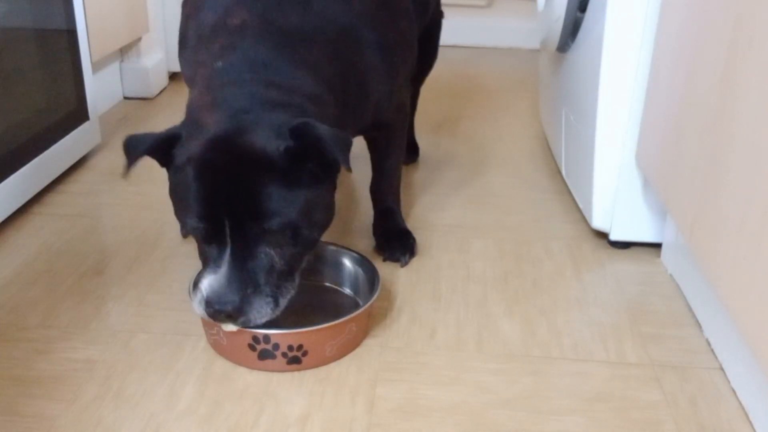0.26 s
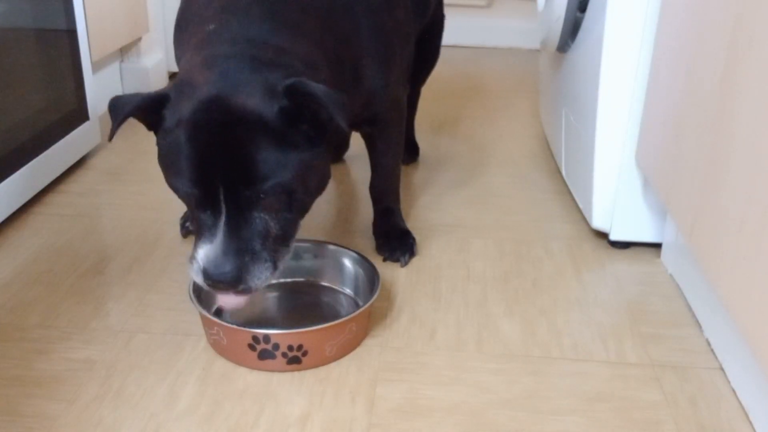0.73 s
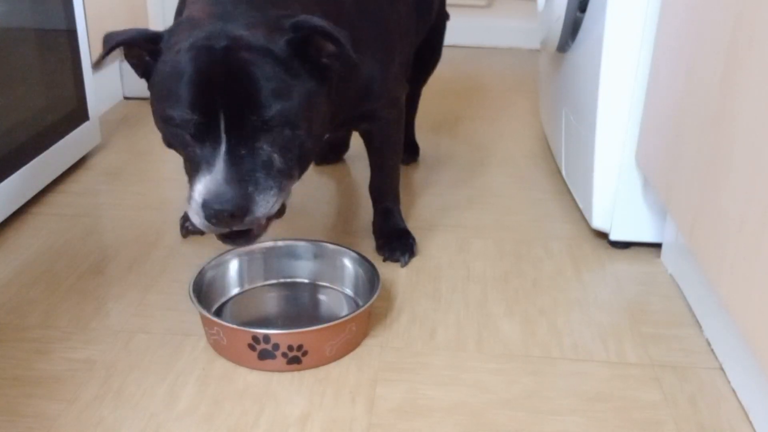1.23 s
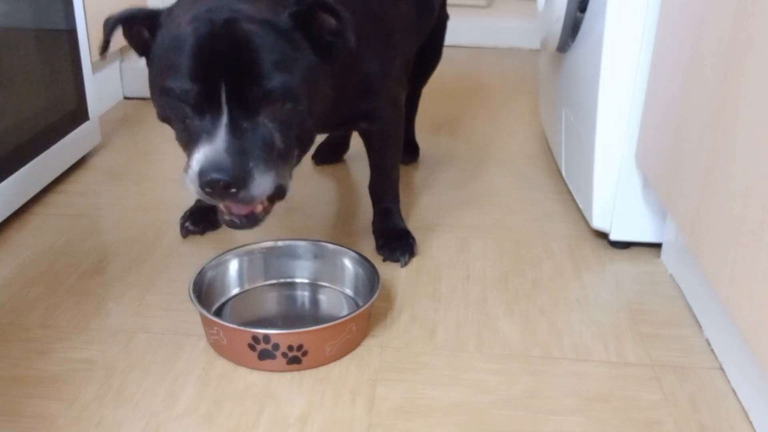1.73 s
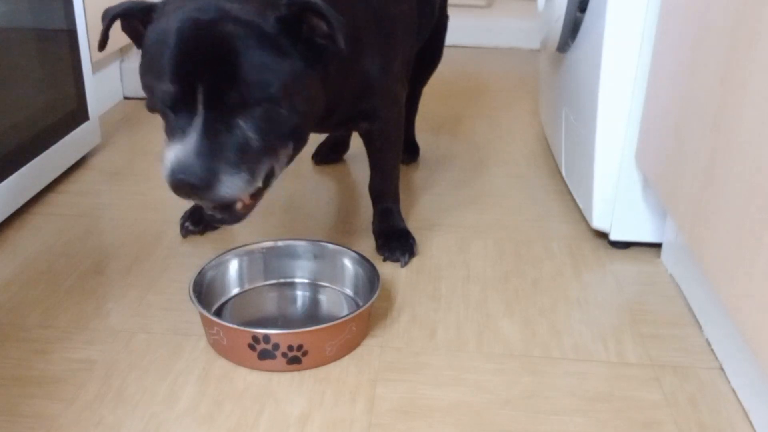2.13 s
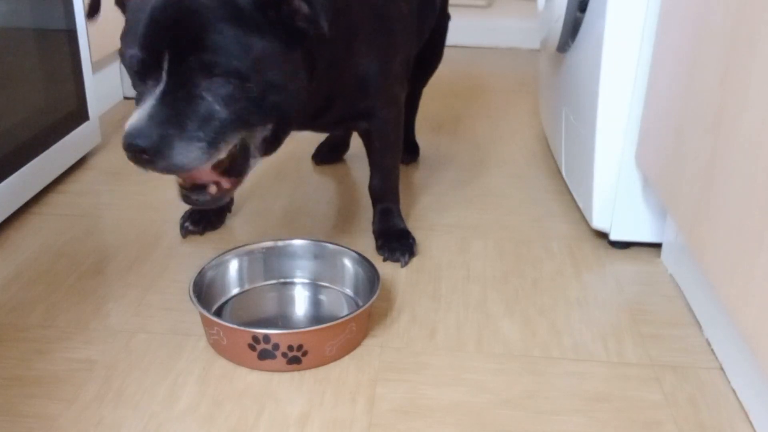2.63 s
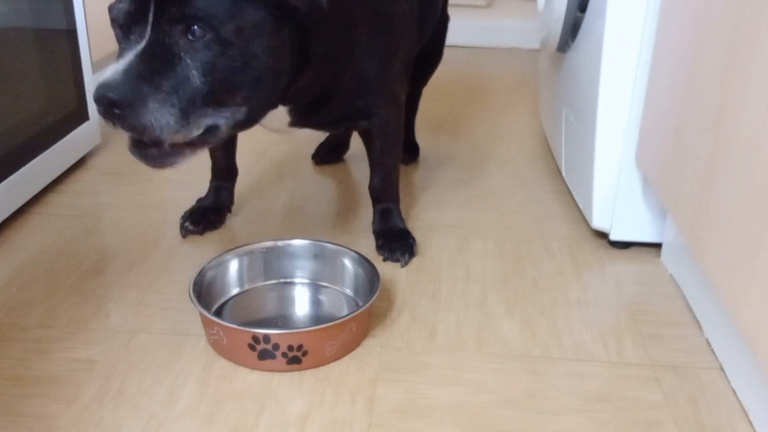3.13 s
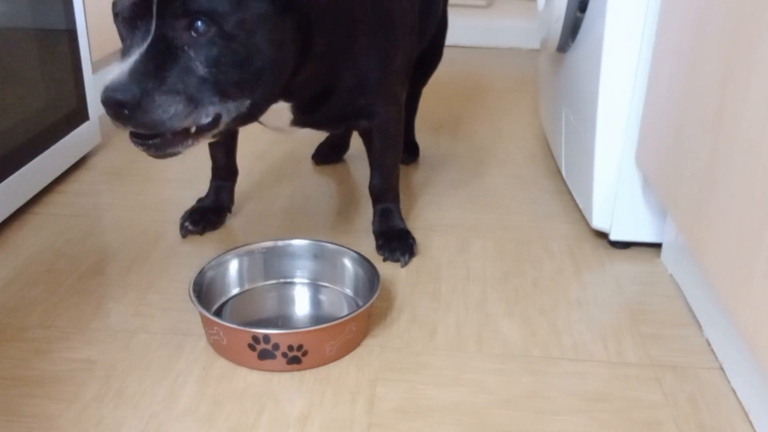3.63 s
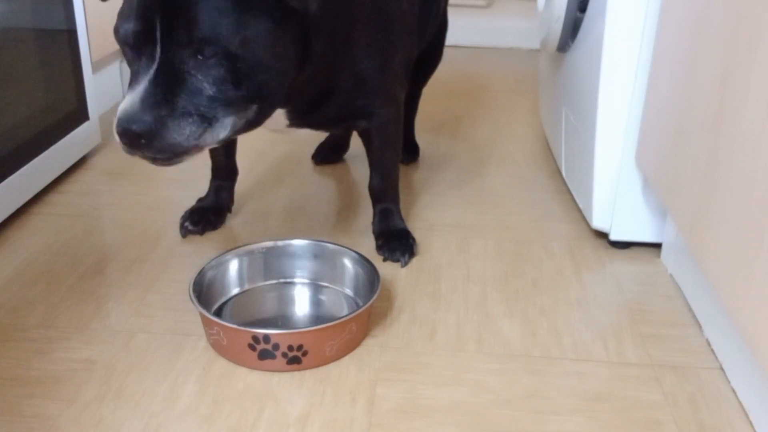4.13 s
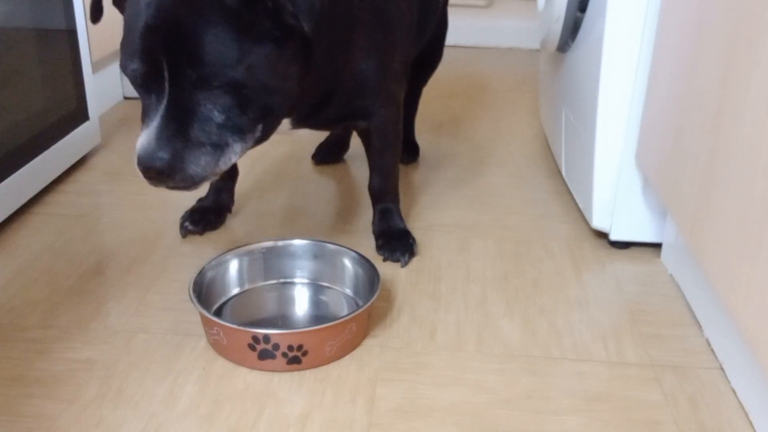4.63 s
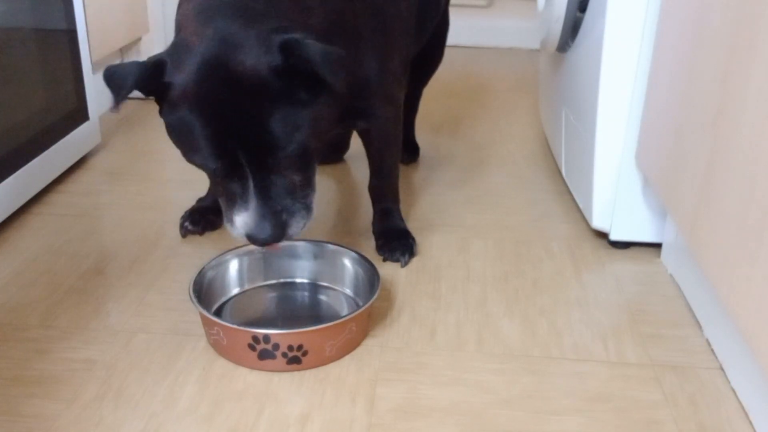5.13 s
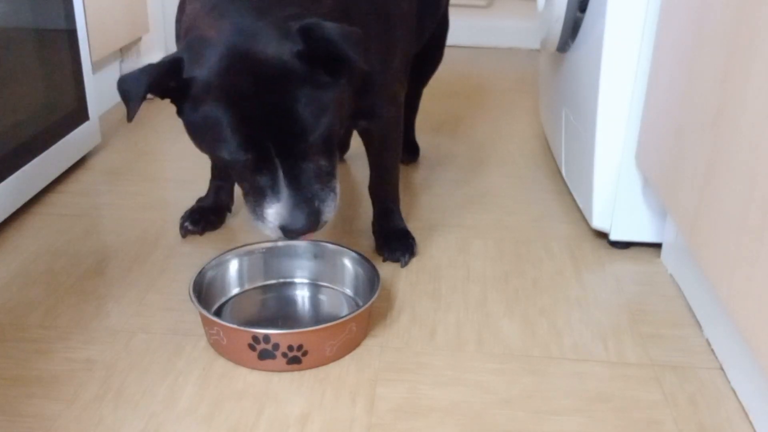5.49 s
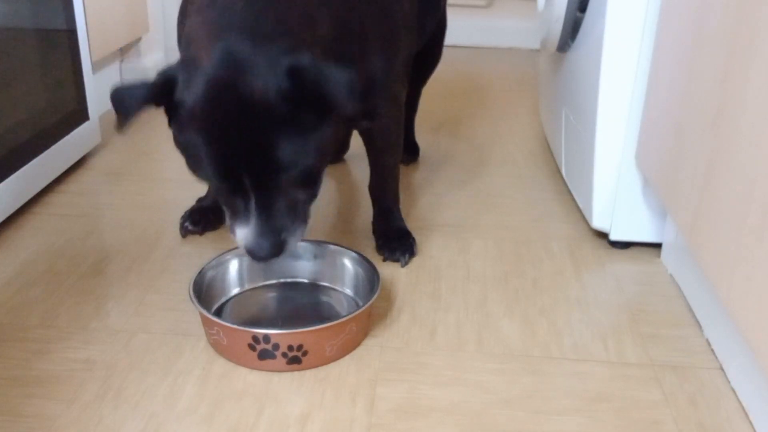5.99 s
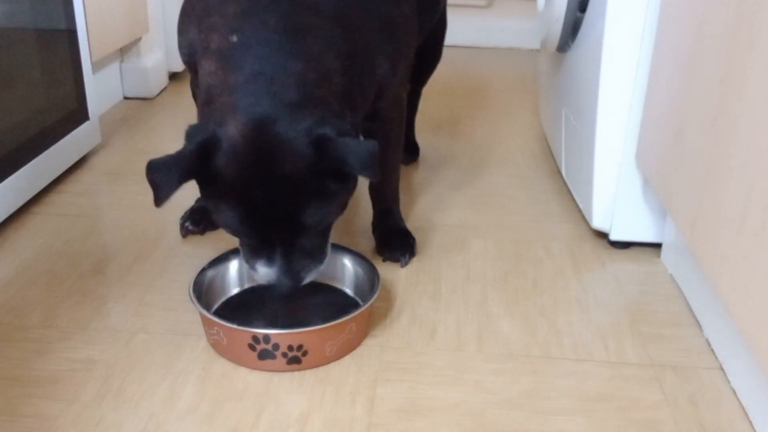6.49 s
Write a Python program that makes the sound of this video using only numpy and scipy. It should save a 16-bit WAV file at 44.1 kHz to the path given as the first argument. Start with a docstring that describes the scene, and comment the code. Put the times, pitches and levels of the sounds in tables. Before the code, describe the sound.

A dog licks up a last morsel and chews open-mouthed in a hard, narrow kitchen, with wet smacks, saliva clicks and soft low thumps.

```python
"""In a hard, narrow kitchen, a dog licks up a last morsel and chews it with an open mouth.
Wet smacks are pops and crackle that ring the mouth; saliva films snap as bright ticks with a fizz.
Gliding air pockets slurp, short notes gloop, low thumps boom and saliva crackles throughout.
The room answers with a fading echo, and a spaced pair of small microphones adds a steady hiss."""
import sys
import numpy as np
from scipy import signal
from scipy.io import wavfile
from scipy.ndimage import uniform_filter1d

SR = 44100
rng = np.random.default_rng(int(sys.argv[2]) if len(sys.argv) > 2 else 0)


def gain_from_db(level_db):
    """Convert decibel levels to linear amplitude factors (20 dB per decade)."""
    decades = np.asarray(level_db, float) / 20
    return 10 ** decades


def put_to_file(sound):
    """Save the sound as 16-bit audio at rate SR, in the file named by the first command-line argument."""
    columns = np.atleast_2d(sound).T  # one column per channel
    safe = np.clip(columns, -1, 1)
    whole_steps = np.round(safe * 32767)
    wavfile.write(sys.argv[1], SR, whole_steps.astype(np.int16))


N = 297675
EVENT_SAMPLES, POP_SAMPLES = 16384, 300  # longest single event, and its opening pop

# Levels of the mouth sounds and thumps are those before the final mix.
# wet smacks: (time [s], peak level of the pop [dB], mouth cavity pitch at start [Hz], squelch length [s])
SMACK_EVENTS = [(0, -24.5, 1650, 0.18), (0.01, -28.5, 725, 0.23), (0.582, -42.5, 2260, 0.47),
                (1.17, -30, 2730, 0.47), (1.185, -24, 1950, 0.16), (1.188, -28.5, 1150, 0.34),
                (1.337, -33.5, 1830, 0.033), (1.728, -32, 1830, 0.35), (1.813, -32, 1800, 0.12),
                (1.86, -30, 1880, 0.44), (1.862, -19, 1300, 0.32), (1.929, -18, 2260, 0.076),
                (1.985, -29, 1880, .04), (2.064, -25, 1250, 0.18), (2.103, -25.5, 1204, 0.82),
                (2.111, -17.5, 1020, 0.3), (2.148, -13.5, 1780, 0.16), (2.252, -22, 2530, 0.22),
                (2.375, -27.5, 2840, 0.46), (2.405, -29, 550, 0.26), (2.452, -28.5, 2980, 0.26),
                (2.502, -29.5, 1040, 0.33), (2.592, -27, 1900, 0.21), (2.63, -27, 1200, 0.11),
                (2.82, -37.5, 1190, 0.42), (2.822, -40, 2620, 0.56), (2.888, -34, 1410, 0.47),
                (2.89, -36.5, 690, 0.35), (2.97, -26.5, 1020, 0.055), (2.982, -29, 1070, 0.056),
                (3.0, -24.5, 1200, 0.06), (3.009, -26.5, 2340, 0.076), (3.027, -24, 1230, 0.067),
                (3.054, -34.5, 1180, 0.22), (3.117, -27.5, 1300, 0.018), (3.128, -30.5, 1140, 0.9),
                (3.195, -22, 2650, 0.34), (3.296, -29, 670, 0.11), (3.41, -24, 1100, 0.12),
                (3.427, -16.5, 1100, 0.045), (3.437, -18.5, 1124, 0.16), (3.524, -25.5, 1340, 0.29),
                (3.618, -21, 2270, 0.052), (3.619, -22.5, 1260, 0.64), (3.634, -14.5, 980, 0.044),
                (3.644, -20, 875, .06), (3.666, -25, 990, 0.063), (3.704, -18.5, 1170, 0.1),
                (3.736, -19.5, 1010, 0.1), (3.771, -23.5, 1090, 0.22), (3.853, -21, 1360, 0.068),
                (3.87, -21.5, 2240, .1), (3.878, -18.5, 1160, 0.061), (3.947, -26, 1260, 0.25),
                (4.004, -25.5, 3230, 0.02), (4.012, -25, 980, 0.16), (4.061, -27, 764, 0.45),
                (4.328, -29, 1210, 0.61), (4.383, -28, 1050, 0.18), (4.404, -30.5, 1180, 0.2),
                (4.434, -23.5, 2750, 0.084), (4.459, -26, 1180, 0.13), (4.556, -31, 1110, 0.11),
                (4.741, -31.5, 3000, 0.55), (4.801, -25.5, 2430, 0.46), (4.852, -16, 1550, 0.046),
                (4.864, -16.5, 1124, 0.31), (5.207, -33, 1400, 0.45), (5.239, -28, 3100, 0.24),
                (5.261, -23, 1690, 0.3), (5.283, -14, 1960, 0.22), (5.625, -22.5, 2100, 0.36),
                (5.717, -18, 2220, 0.086), (5.734, -21.5, 2290, 0.45), (5.719, -26, 1080, 0.3),
                (5.809, -23, 1240, 0.47), (5.639, -31.5, 760, 0.5), (5.892, -25, 716, 0.34),
                (6.049, -34.5, 640, 0.52), (5.905, -24.5, 3040, 0.19), (5.961, -24.5, 3230, 0.25),
                (5.972, -24.5, 1720, 0.17), (6.067, -25, 3400, 0.1), (6.103, -28.5, 1620, 0.27),
                (6.147, -18, 1370, 0.057), (6.164, -22.5, 3100, .1), (6.204, -26.5, 1280, 0.38),
                (6.247, -23, 646, 0.055), (6.337, -25.5, 830, 0.15)]
# upper resonances of the muzzle: (centre pitch [Hz], basic width [Hz], level [dB])
MUZZLE_RESONANCES = [(2370, 540, -9.5), (3750, 490, -9.5)]
# saliva films tearing:
# (time [s], peak level of the tick [dB], whistle pitch [Hz], level of airy top [dB], fizz length [s])
SNAP_EVENTS = [(0, -25, 3380, 8.5, 0.39), (0.4647, -30.5, 6300, 11.5, 0.18), (0.589, -33, 8100, 15, 0.11),
               (0.775, -34.5, 7200, 5, 0.087), (0.947, -30.5, 5100, 13.5, 0.082),
               (1.165, -24, 8430, 6, 0.64), (1.182, -19.5, 5540, 5.5, 0.14),
               (1.334, -25.5, 8200, -14, 0.058), (1.724, -22.5, 7650, 19, 0.28),
               (1.866, -27.5, 3750, 16, 0.41), (2.108, -21, 7200, 6, 0.08), (2.137, -21, 4640, 11.5, 0.4),
               (2.252, -22.5, 5700, -6, 0.86), (2.562, -25, 7100, -7, 0.17), (2.593, -25.5, 5360, -19, 0.3),
               (2.681, -28.5, 8060, 16, 0.079), (2.995, -34, 4830, 15, 0.34), (3.188, -24.5, 4570, 7, 0.35),
               (3.424, -19.5, 5060, 6, 0.2), (3.52, -19, 8300, 24, 0.017), (3.627, -28, 4160, 8, 0.95),
               (3.629, -20, 8300, -11, 0.097), (3.695, -23.5, 5640, 9, 0.12), (3.878, -17, 3360, 7.5, 0.22),
               (3.959, -20, 8000, 32, 0.093), (4.319, -30.5, 8200, 8, 0.49), (4.415, -24, 8250, 12, 0.19),
               (4.444, -19.5, 4200, -24, 0.12), (4.46, -22.5, 4200, 37, 0.11),
               (4.469, -20, 4300, -14, 0.35), (4.596, -36, 4640, -14, 0.6), (4.827, -25.5, 4450, 11, 0.15),
               (4.857, -24, 3200, 3.5, 0.55), (5.2383, -25, 4530, 2.5, 0.16),
               (5.621, -24.5, 6840, 13, 0.35), (5.829, -31, 3800, -20, 0.26),
               (5.962, -17.5, 3430, -41, 0.049), (6.009, -23.5, 5250, -16, 0.058),
               (6.064, -21, 5740, 8, 0.13), (6.72, -36, 5650, 0, .3), (6.741, -25, 5340, 12, .3)]
# tone colour of crackling saliva: (frequency [Hz], relative level [dB])
SALIVA_COLOUR = [(1200, -59.5), (2500, 16), (4000, 18.5), (6000, 20.5), (7800, 24), (9200, 9), (12000, -12)]
# tone colour of the airy top of a snap: (frequency [Hz], relative level [dB])
AIRY_COLOUR = [(6000, 5), (9000, 7), (11000, 6.5), (15500, -3)]
# hollow slurps of the tongue:
# (start [s], length [s], level before fading [dB], cavity pitch at start [Hz], cavity pitch at end [Hz])
SLURP_EVENTS = [(0.258, 0.11, -56.5, 1500, 1460), (0.309, 0.12, -53.5, 1280, 1190),
                (0.254, 0.19, -56.5, 3030, 2970), (0.47, 0.16, -49, 644, 626),
                (0.879, 0.086, -49.5, 690, 690), (1.638, 0.095, -49.5, 4660, 5100),
                (1.963, 0.12, -42, 640, 600), (2.501, 0.17, -45.5, 1380, 2240),
                (4.001, 0.21, -41.5, 955, 547), (4.854, .05, -56, 433, 440), (4.951, 0.069, -40, 450, 450),
                (5.89, 0.32, -49, 468, 460), (5.387, 0.052, -49, 716, 604)]
# popping air pocket under the tongue: (time [s], peak level [dB], pitch at start [Hz], length [s])
GLOOP_EVENTS = [(0.148, -45.5, 688, 0.02), (0.533, -39.5, 616, 0.033), (0.596, -32.5, 756, 0.011),
                (0.609, -36.5, 766, 0.019), (0.888, -37, 668, 0.02), (1.86, -20.5, 1844, 0.0073),
                (5.718, -26, 1119, 0.024), (5.735, -29.5, 1051, 0.022), (6.249, -23, 706, 0.013),
                (6.252, -27.5, 1016, 0.018)]
# low thumps: (time [s], level of main tone [dB], middle pitch [Hz], time to fade by 60 dB [s])
THUMP_EVENTS = [(1.315, -35.5, 123.5, 0.18), (2.409, -40.5, 142, .17), (3.055, -35, 143, 0.056),
                (3.241, -30, 135.6, 0.26), (3.786, -10.5, 139.2, 0.24), (3.857, -20.5, 174.3, 0.088),
                (4.088, -25.5, 140, 0.18), (4.947, -14, 136.8, 0.15), (5.887, -39, 199, 0.13),
                (6.116, -28, 147.2, 0.25), (6.169, -33, 139.6, 0.34), (6.334, -18.5, 135, 0.11),
                (6.722, -30.5, 166, .15)]
# low room modes: (pitch [Hz], width [Hz], relative level [dB])
ROOM_MODES = [(90, 18, 1), (135, 14.4, -6.5), (178.3, 8.3, -4), (203, 11, 0.5), (255, 46, -3.5)]
# background crackle of the working jaw: (time [s], level [dB])
JAW_EFFORT = [(0, -47.5), (.21, -67), (.3, -54.5), (.4, -61), (.45, -63), (.55, -58.5), (0.859, -60),
              (1.13, -53), (1.55, -78), (1.9, -46), (2.6, -73), (2.78, -55), (3.0, -54), (3.3, -57),
              (3.8, -46), (4.2, -50.5), (4.5, -70), (5.15, -57.5), (5.3, -50), (5.55, -69.5), (6.05, -41.5),
              (6.38, -54), (6.46, -61.5), (6.75, -84)]
# how fast the kitchen echo dies: (frequency [Hz], time to fade by 60 dB [s])
ECHO_FADE = [(150, 0.069), (600, 0.37), (2000, 0.32), (6000, 0.19), (14000, 0.21)]
# tone colour of room tone and hiss: (frequency [Hz], relative level [dB])
HUSH_COLOUR = [(15, -42), (30, -11.5), (117, -0.5), (206, -8), (516, -11.5), (1200, -17.5), (2500, -21.5),
               (5000, -20), (7800, -18.5), (9300, -37), (13000, -26.5), (15800, -24.5)]
# left-right likeness of the hush: (frequency [Hz], likeness from 0 to 1 [no unit])
HUSH_LIKENESS = [(60, 0.21), (150, 0.32), (260, 0.13), (800, 0.064), (3000, 0.0051)]


def evened(x):
    """Scales a sound to an average (rms) strength of 1."""
    return x / np.sqrt(np.mean(x ** 2) + 1e-20)


def read_curve(points, hz):
    """Reads a curve between its points, on a log-frequency axis."""
    f, value = np.transpose(points)
    return np.interp(np.log(hz + 1), np.log(f + 1), value)


def add(mix, s, sound):
    """Mixes a sound in at time s, cutting it off at the end of the mix."""
    part = mix[..., round(s * SR):][..., :sound.shape[-1]]
    part += sound[..., :part.shape[-1]]


def resonate(x, hz, width_hz):
    """A resonance of gain 1: shifts the pitch hz down to zero, smooths, and shifts back."""
    turn = np.exp(2j * np.pi * np.cumsum(hz * np.ones(x.shape[-1])) / SR)
    r = np.exp(-np.pi * width_hz / SR)
    smooth = signal.lfilter([1 - r], [1, -r], x / turn)
    return 2 * (turn * smooth).real


def resonate_twice(x, hz, width_hz, second_width_hz):
    """Two resonances in a row at one pitch, for steeper sides."""
    return resonate(resonate(x, hz, width_hz), hz, second_width_hz)


def colour_filter(points):
    """A short filter with the given tone colour that responds as early as it can (minimum phase)."""
    hz = abs(np.fft.fftfreq(1024, 1 / SR))
    log_gain = np.log(gain_from_db(read_curve(points, hz)))
    spectrum = np.exp(log_gain - 1j * signal.hilbert(log_gain).imag)
    return np.fft.ifft(spectrum).real[:256]


def bubbles(shape, per_s, spread_db):
    """Tiny bursting films: sparse clicks of random sign and uneven size."""
    size = gain_from_db(spread_db * np.minimum(rng.exponential(1, shape), 3.2))
    size = size * rng.choice([-1., 1.], shape)
    return size * (rng.random(shape) < per_s / SR)


def squelch(wet, length, level_db, fade, rise_s, clump_db):
    """One pop, its floor bounce and a crackle that comes in clumps, holds briefly, then dies."""
    t = np.arange(EVENT_SAMPLES) / SR
    wet = wet + 0.3 * np.roll(wet[::-1], 3)  # the microphones share some detail
    clumps = rng.standard_normal(EVENT_SAMPLES)
    clumps = evened(uniform_filter1d(uniform_filter1d(clumps, size=180), size=180))
    fade_db = -60 * (t / max(length, .02)) ** fade
    drive = gain_from_db(level_db + fade_db + clump_db * np.minimum(clumps, 1)) * wet
    drive *= np.minimum(t / rise_s, 1)
    drive *= 1 + 3.35 * np.exp(-t / 0.0055)  # the first bubbles burst hardest
    drive = drive[:, :2 * POP_SAMPLES + int(length * SR)]
    drive[0, 3], drive[1, 0] = 1, .8  # the pop reaches the right microphone first
    drive[[0, 1], [130, 145]] += .6  # bounce off the floor
    return drive


def smacks():
    """Each smack rings the muzzle and the mouth cavity, whose pitch bends slightly up or down at random."""
    out, t = np.zeros((2, N)), np.arange(EVENT_SAMPLES) / SR
    crackle = bubbles((len(SMACK_EVENTS), 2, EVENT_SAMPLES), per_s=1100, spread_db=5.0)
    shapes = rng.uniform(-1, 1, (len(SMACK_EVENTS), 1 + len(MUZZLE_RESONANCES)))
    for (s, db, hz, length), wet, (bend, *shifts) in zip(SMACK_EVENTS, crackle, shapes):
        cavity_width_hz = hz * 0.27 * (hz / 1e3) ** -0.2  # higher cavities are narrower for their pitch
        drive = squelch(wet, length, level_db=-21.0, fade=1.485, rise_s=0.002, clump_db=5.5)
        # the cavity pitch bends by up to 7 percent
        cavity_hz = hz * (1 + 0.07 * bend * np.tanh(t[:drive.shape[1]] / 0.021))
        ring = resonate_twice(drive, cavity_hz, cavity_width_hz, 1.6 * cavity_width_hz)
        # broad slap of wet flesh
        slap = resonate(resonate(drive, 1.08 * cavity_hz, 750), 1.68 * cavity_hz, 1560)
        ring += gain_from_db(-8.5) * slap
        for (upper_hz, width_hz, upper_db), shift in zip(MUZZLE_RESONANCES, shifts):
            here_hz = upper_hz * (1 + 0.21 * shift)
            ring += gain_from_db(upper_db) * resonate_twice(drive, here_hz, width_hz, 2.75 * width_hz)
        add(out, s, gain_from_db(db) * ring / abs(ring[:, :POP_SAMPLES]).max())
    return out


def snaps():
    """Each snap is a bright tick and a short fizz, tinted by the gap it bursts through."""
    out = np.zeros((2, N))
    spit, air = evened(colour_filter(SALIVA_COLOUR)), evened(colour_filter(AIRY_COLOUR))
    crackle = bubbles((len(SNAP_EVENTS), 2, EVENT_SAMPLES), per_s=2400, spread_db=3.0)
    for (s, db, hz, air_db, length), wet in zip(SNAP_EVENTS, crackle):
        drive = squelch(wet, length, level_db=-14.5, fade=1.37, rise_s=0.0072, clump_db=6.5)
        spray = 0.16 * np.tanh(drive / 0.62)  # the finest spray has no single loud tick
        fizz = signal.oaconvolve(drive, spit[None], axes=1)
        fizz += gain_from_db(air_db) * signal.oaconvolve(spray, air[None], axes=1)
        fizz += gain_from_db(7.0) * resonate_twice(fizz, hz, 800, 1500)  # the whistle of the gap
        add(out, s, gain_from_db(db) * fizz / abs(fizz[:, :POP_SAMPLES]).max())
    return out


def slurps():
    """Sparse bubbles ring a narrow, gliding pocket of air under the tongue."""
    out = np.zeros((2, N))
    for s, length, db, start_hz, end_hz in SLURP_EVENTS:
        t = np.arange(0, length, 1 / SR)
        pocket_hz = start_hz + (end_hz - start_hz) * t / length
        mean_hz = (start_hz + end_hz) / 2
        wet = bubbles((2, len(t)), per_s=350, spread_db=-2.0)
        ring = evened(resonate_twice(wet, pocket_hz, 0.12 * mean_hz, 1.24 * mean_hz))
        for upper_hz, width_hz, upper_db in MUZZLE_RESONANCES:
            ring = ring + gain_from_db(upper_db - 4.0) * evened(resonate(wet, upper_hz, 1.3 * width_hz))
        # opens in 2.3 ms, then fades by 8.5 dB over its length
        shape = np.minimum(t / 0.0023, 1) * gain_from_db(-8.5 * t / length)
        soft_ends = signal.windows.tukey(len(t), .15)
        add(out, s, gain_from_db(db) * shape * evened(ring) * soft_ends)
    return out


def gloops():
    """Each note swells and fades quickly, rising slightly as the air pocket closes."""
    out = np.zeros(N)
    for (s, db, hz, length), phase in zip(GLOOP_EVENTS, rng.random(len(GLOOP_EVENTS))):
        u = np.arange(0, length, 1 / SR) / length  # runs from 0 to 1 through the note
        swell = np.sin(np.pi * u ** 0.3)
        cycles = hz * length * u * (1 + 0.01 * u) + phase
        add(out, s, gain_from_db(db) * swell * np.sin(2 * np.pi * cycles))
    return out


def thumps():
    """Low, wavering thumps swell, fade and ring the room's modes, a little louder on the left."""
    thump, t = np.zeros(N), np.arange(EVENT_SAMPLES) / SR
    swell_s = 0.017
    waver = uniform_filter1d(rng.standard_normal((len(THUMP_EVENTS), EVENT_SAMPLES)), 400)
    for (s, db, hz, fade_s), w in zip(THUMP_EVENTS, waver):
        turns = 2 * np.pi * np.cumsum(hz * (1 + 1.66 * w)) / SR
        tone = np.sin(turns) + 0.15 * np.sin(1.5 * turns)
        tone += 0.059 * np.sin(1.84 * turns) + 0.13 * np.sin(0.648 * turns)
        swell = np.sin(np.pi / 2 * np.minimum(t / swell_s, 1))
        fade = gain_from_db(-60 * (np.maximum(t - swell_s, 0) / fade_s) ** 1.74)
        add(thump, s, gain_from_db(db) * swell * fade * tone)
    boom = sum(gain_from_db(db) * resonate(thump, hz, width_hz) for hz, width_hz, db in ROOM_MODES)
    return (0.17 * thump + .5 * boom) * gain_from_db(np.array([[1.2], [-1.2]]))  # left, right [dB]


def chewing():
    """Saliva crackles faintly, louder and softer with the jaw's effort."""
    effort_db = np.interp(np.arange(N) / SR, *np.transpose(JAW_EFFORT))
    wet = bubbles((2, N), per_s=2500, spread_db=7.5)
    crackle = signal.oaconvolve(wet, colour_filter(SALIVA_COLOUR)[None], axes=1)[:, :N]
    return gain_from_db(effort_db) * evened(crackle)


def kitchen(x):
    """Echo of sparse taps of random sign, each band dying at its own speed, other taps per side."""
    taps = np.zeros((2, SR))
    # one tap somewhere in every 20 samples
    at = np.arange(300, SR - 20, 20) + rng.integers(0, 20, (2, (SR - 301) // 20))
    np.put_along_axis(taps, at, rng.choice([-1., 1.], at.shape), 1)
    hz, t, z = signal.stft(taps, SR, nperseg=256)
    fade = gain_from_db(-60 * t / read_curve(ECHO_FADE, hz)[:, None])
    tail = signal.istft(z * fade, SR, nperseg=256)[1]
    return signal.fftconvolve(x, tail / np.linalg.norm(tail[0]), axes=1)[:, :N]


def hush():
    """Steady room tone and microphone hiss: coloured noise with faint drifting patches."""
    frames, hz = N // 256 + 5, np.fft.rfftfreq(1024, 1 / SR)
    a, b, c, d, patches = rng.standard_normal((frames, 513, 5)).T
    patches = uniform_filter1d(patches, 12, axis=0)  # blurred across frequency
    patches = evened(uniform_filter1d(patches, 14, axis=1))  # blurred across time
    same = np.clip(read_curve(HUSH_LIKENESS, hz), -1, 1)[:, None]
    left = a + 1j * b
    right = same * left + np.sqrt(1 - same ** 2) * (c + 1j * d)
    z = np.array([left, right])
    z *= gain_from_db(read_curve(HUSH_COLOUR, hz)[:, None] + 2.2 * patches)
    noise = signal.istft(z, nperseg=1024, noverlap=768)[1][:, :N]
    return gain_from_db(-52) * evened(noise)


def scene():
    """The mouth a little to the left, its echo, the thumps and the hush."""
    mouth = smacks() + snaps() + slurps() + gloops() + chewing()
    mouth = mouth * gain_from_db(np.array([[2.5], [.1]]))  # left, right [dB]
    low = thumps()
    high_pass = signal.butter(6, 200, "high", fs=SR, output="sos")
    overtones = signal.sosfilt(high_pass, low)  # only these scatter in the room
    echo = kitchen(gain_from_db(-1.0) * mouth + gain_from_db(6.0) * overtones)
    return mouth + low + echo + hush()


def low_pass(x):
    """Removes everything above the highest recorded frequency."""
    return signal.sosfilt(signal.butter(12, 16650, fs=SR, output="sos"), x)


def record(dry):
    """Small microphones lose the deepest bass; a band limit then removes the highest treble."""
    bass_cut = signal.butter(2, 70, "high", fs=SR, output="sos")
    thin = signal.sosfilt(bass_cut, dry)
    treble_limit = signal.firwin(255, 15900, fs=SR)
    mix = signal.oaconvolve(thin, treble_limit[None], "same")
    return low_pass(mix)


dry = scene()
out = record(dry)
put_to_file(out)
```